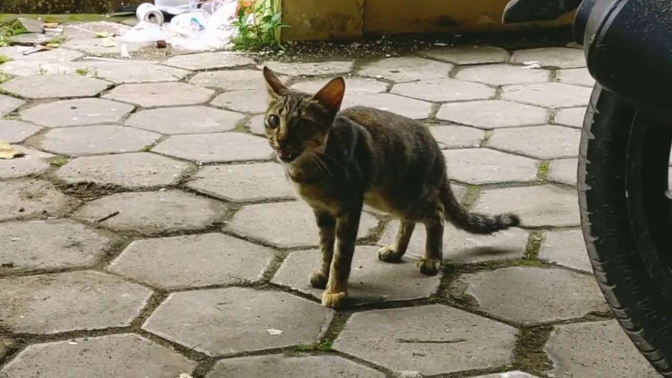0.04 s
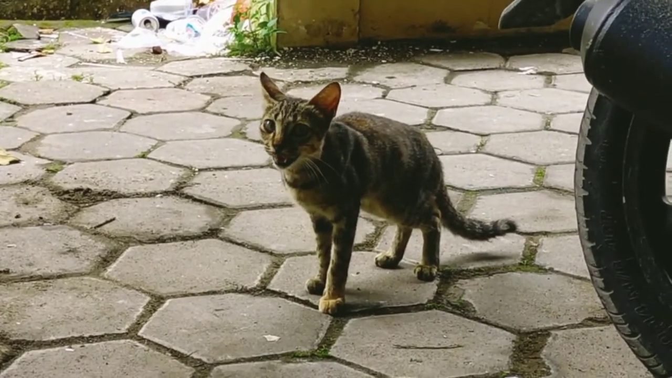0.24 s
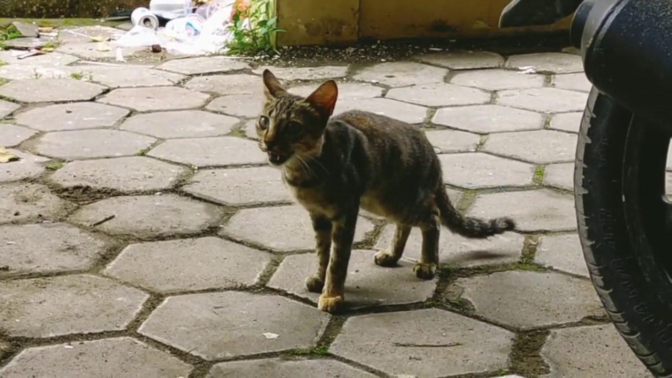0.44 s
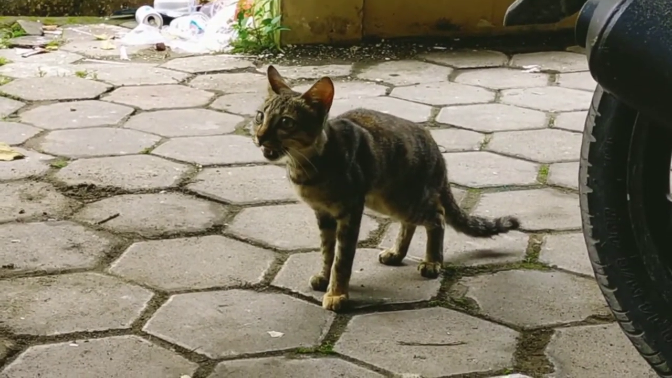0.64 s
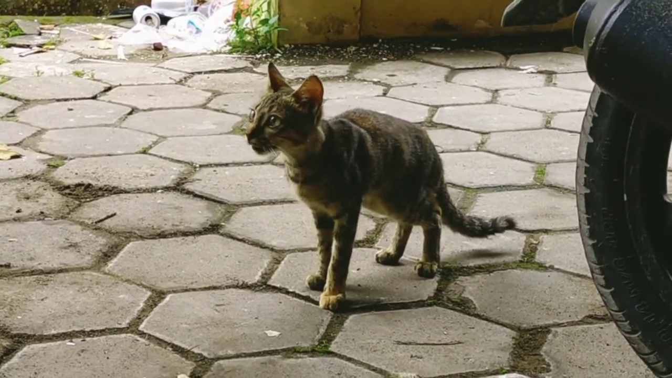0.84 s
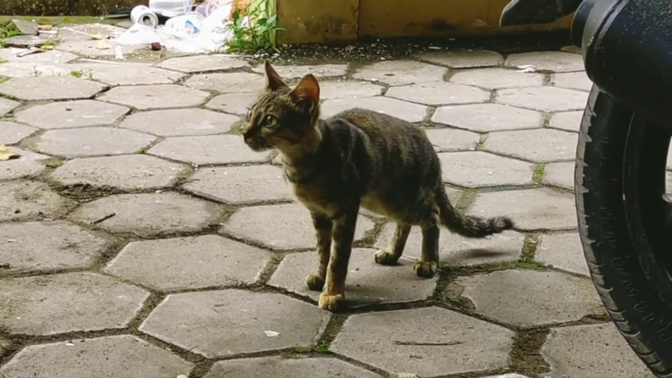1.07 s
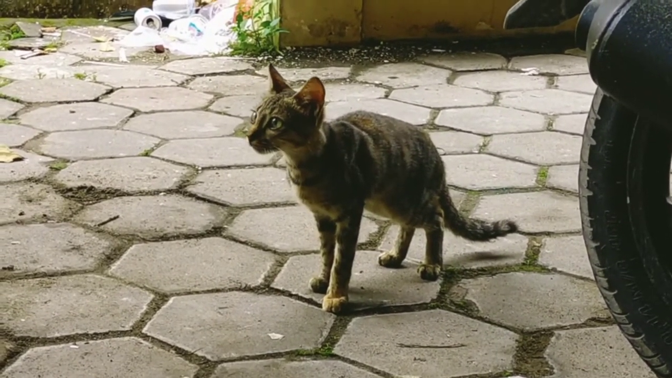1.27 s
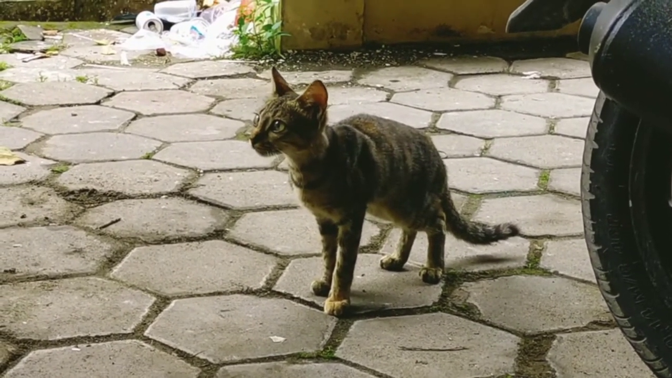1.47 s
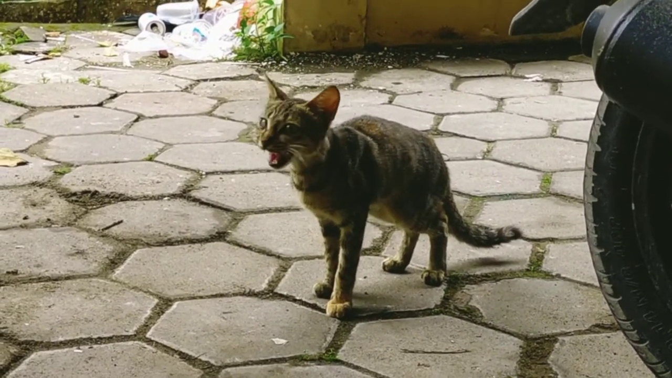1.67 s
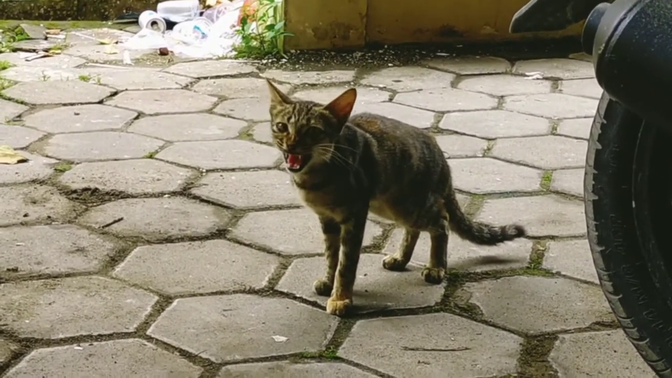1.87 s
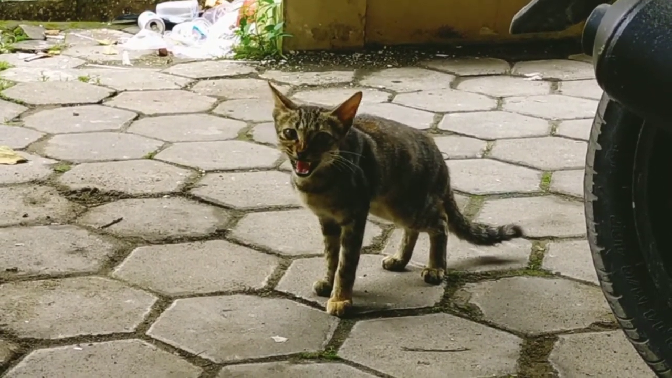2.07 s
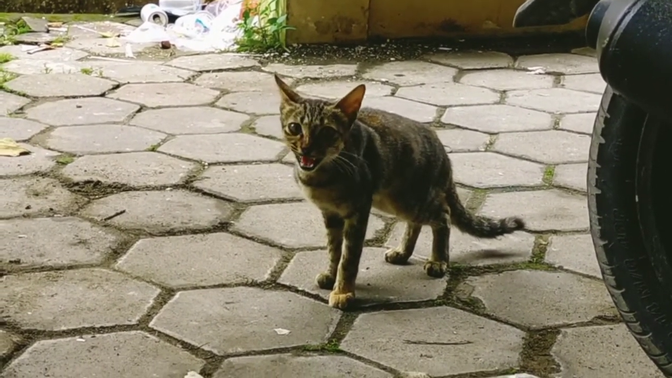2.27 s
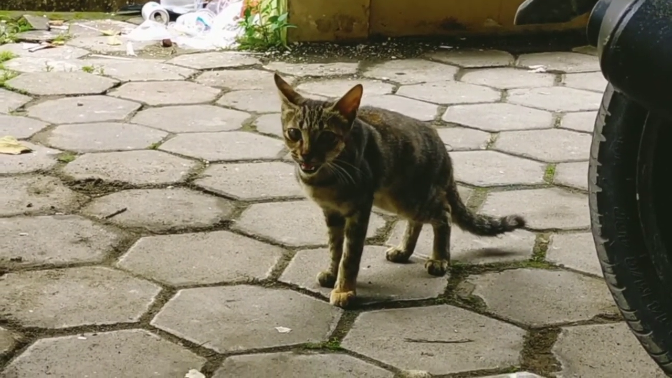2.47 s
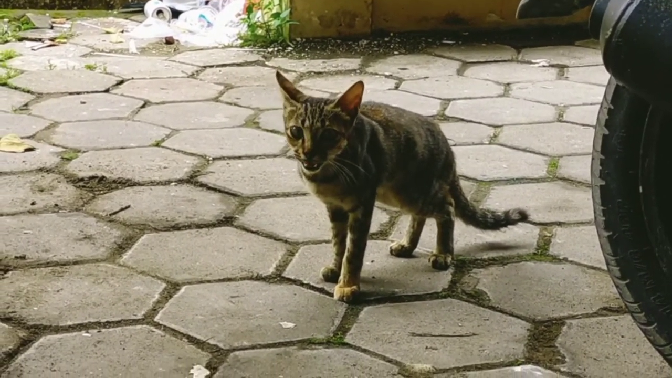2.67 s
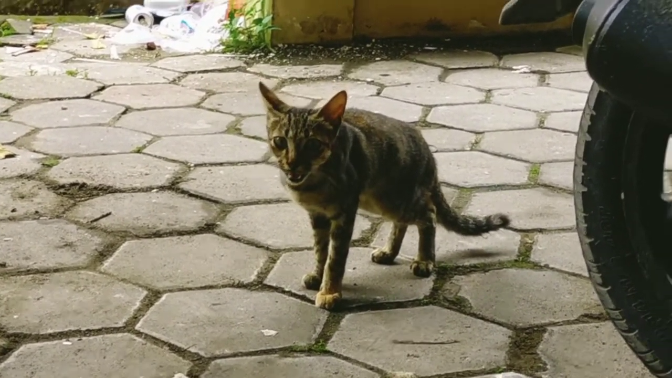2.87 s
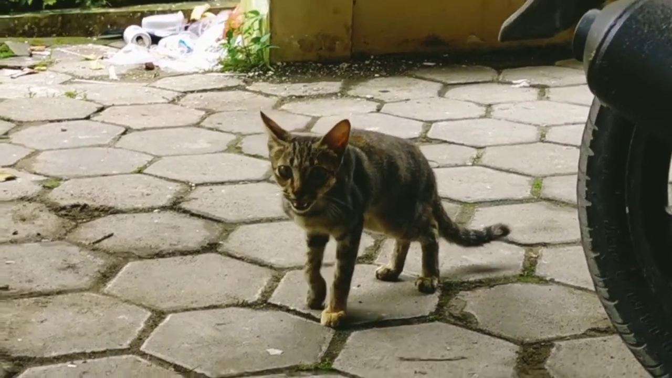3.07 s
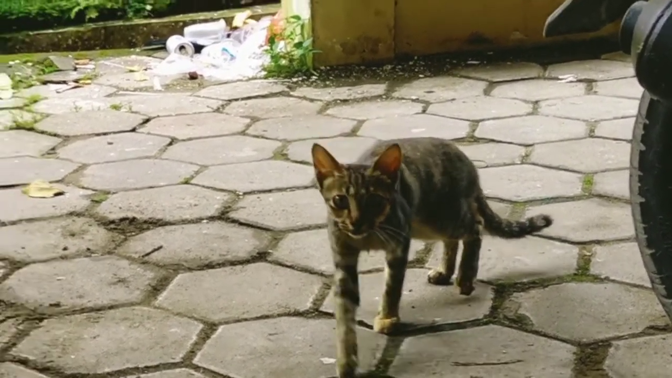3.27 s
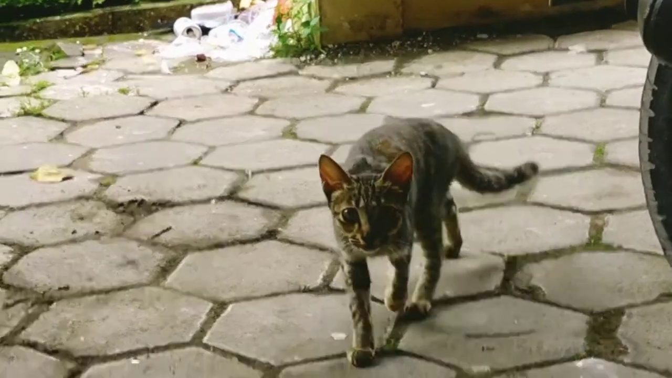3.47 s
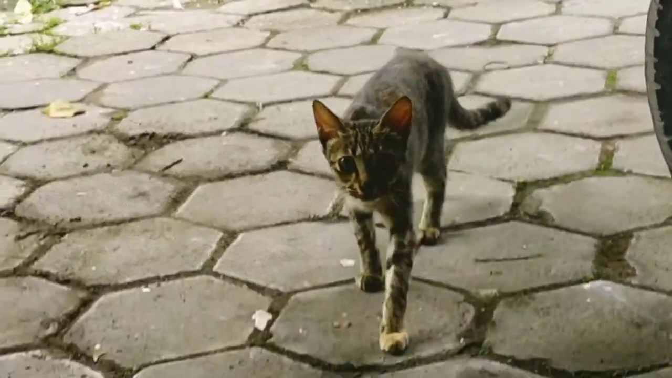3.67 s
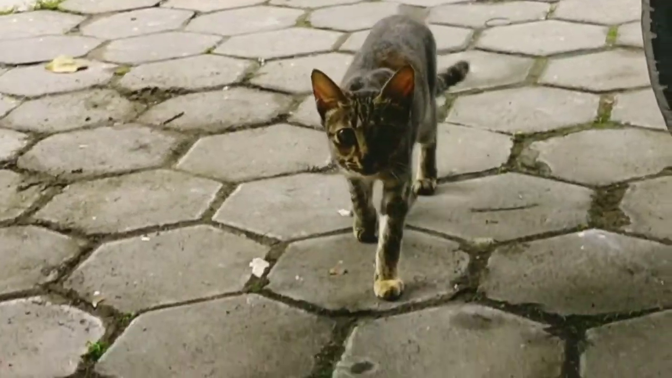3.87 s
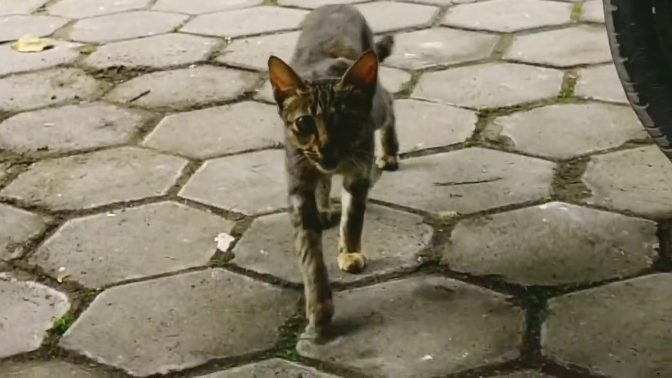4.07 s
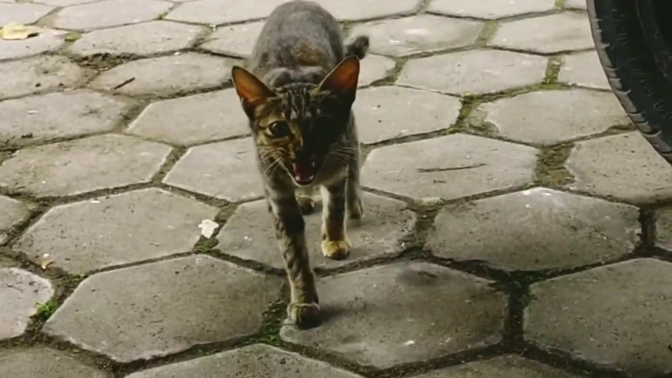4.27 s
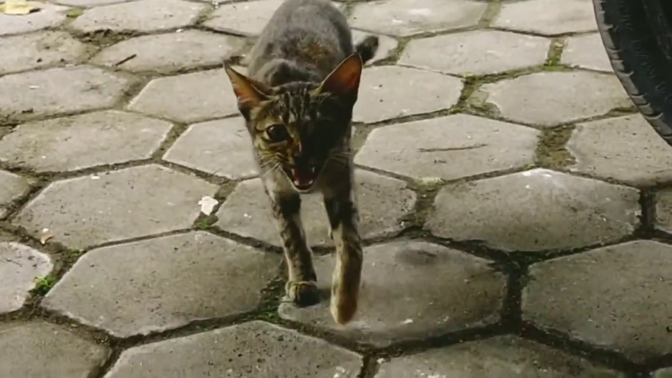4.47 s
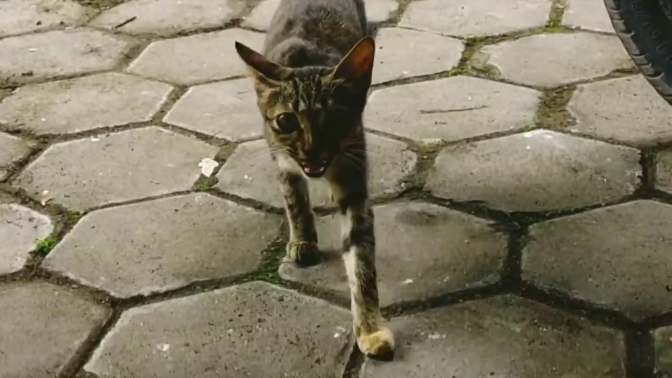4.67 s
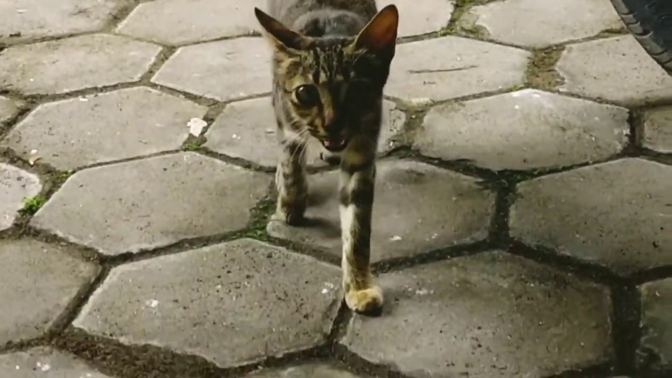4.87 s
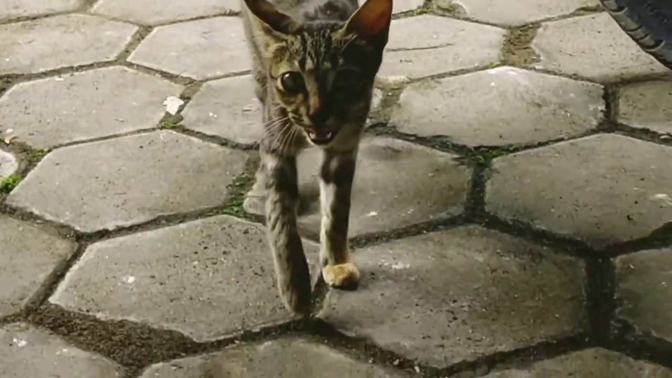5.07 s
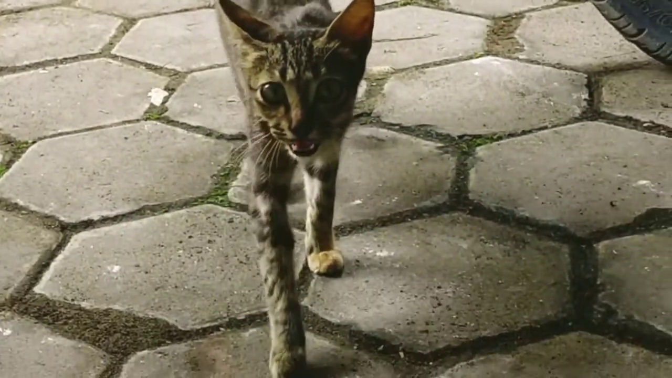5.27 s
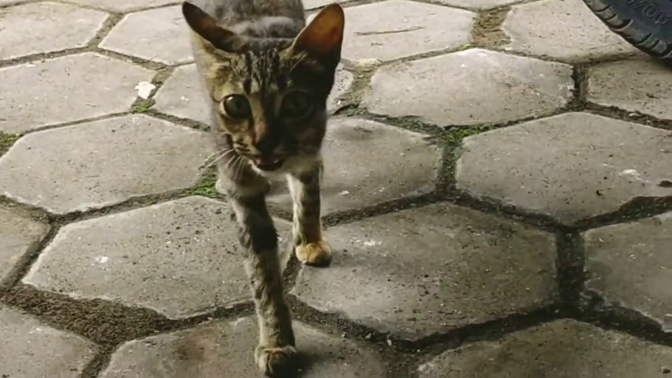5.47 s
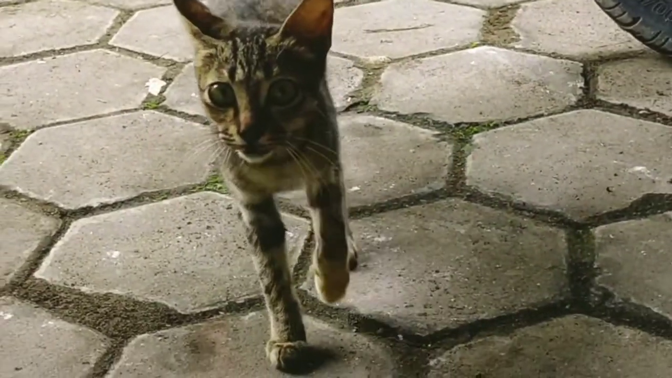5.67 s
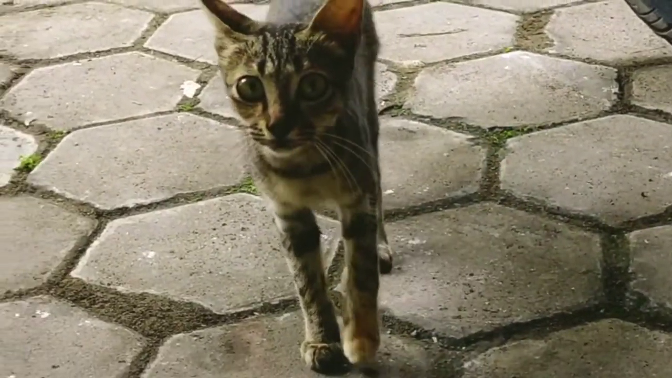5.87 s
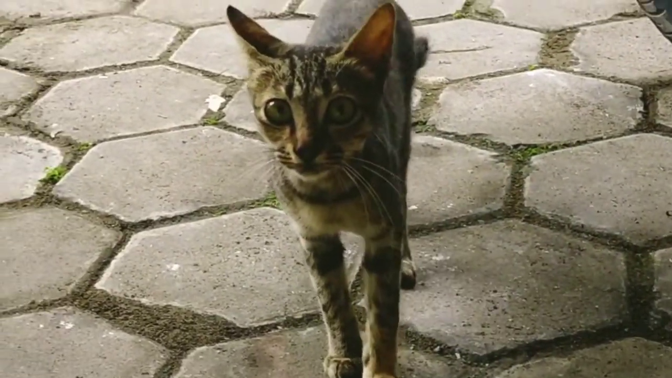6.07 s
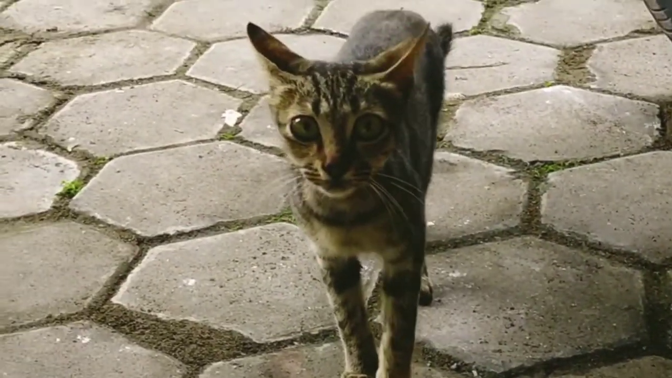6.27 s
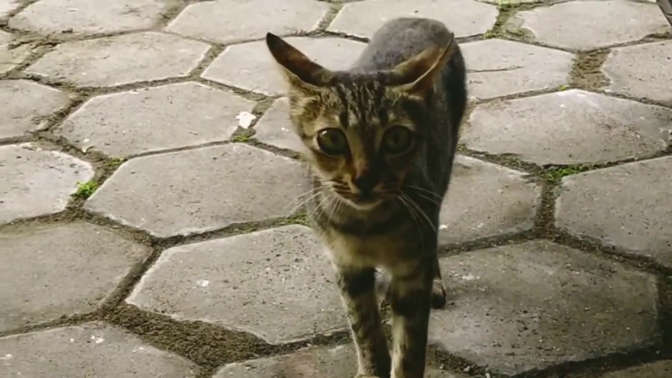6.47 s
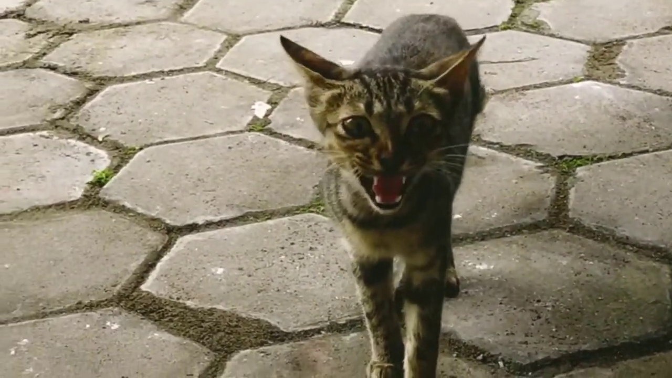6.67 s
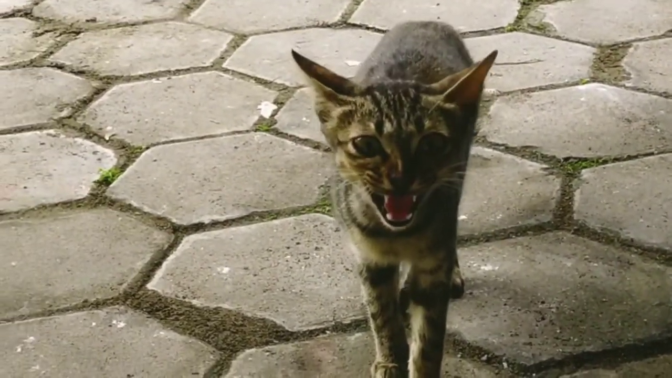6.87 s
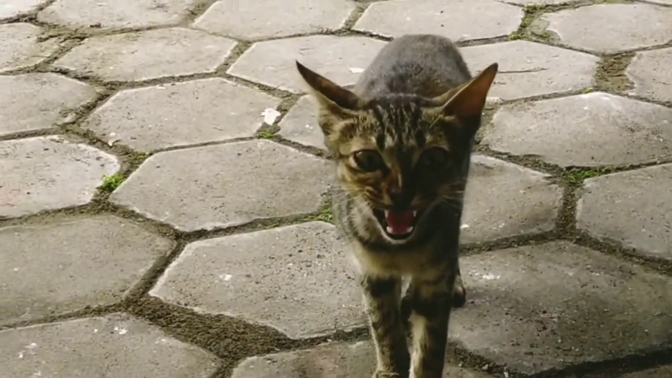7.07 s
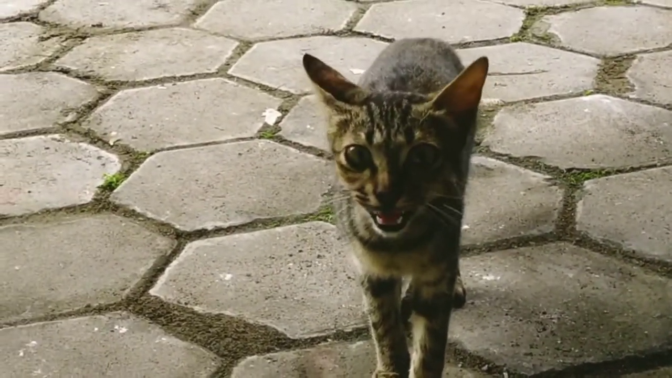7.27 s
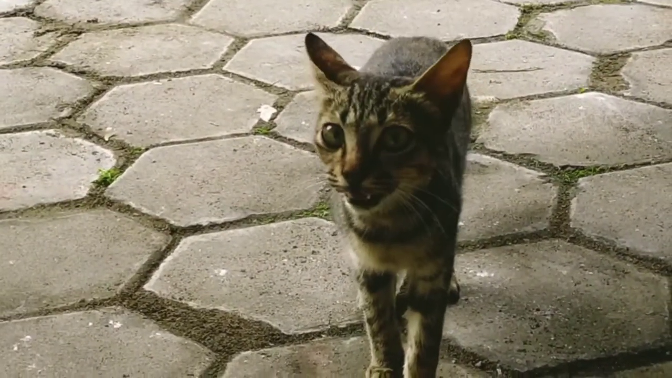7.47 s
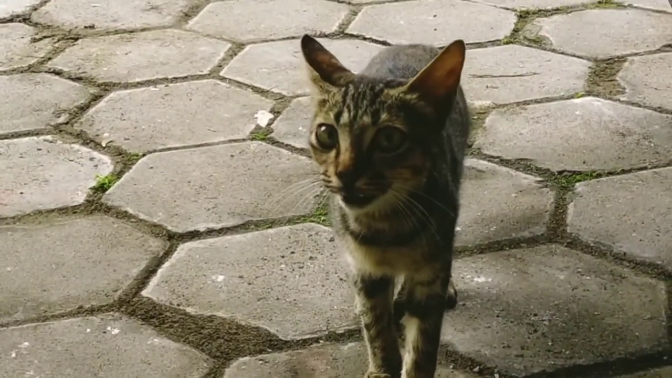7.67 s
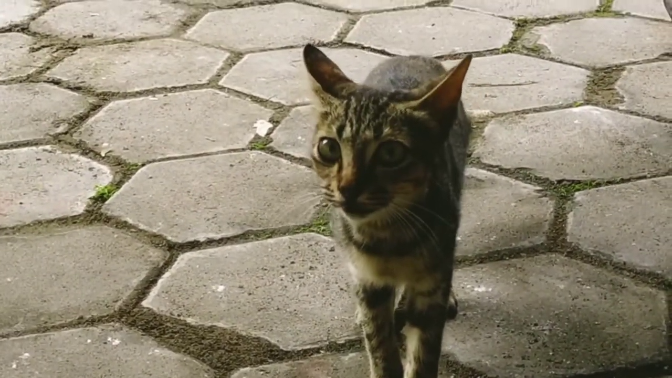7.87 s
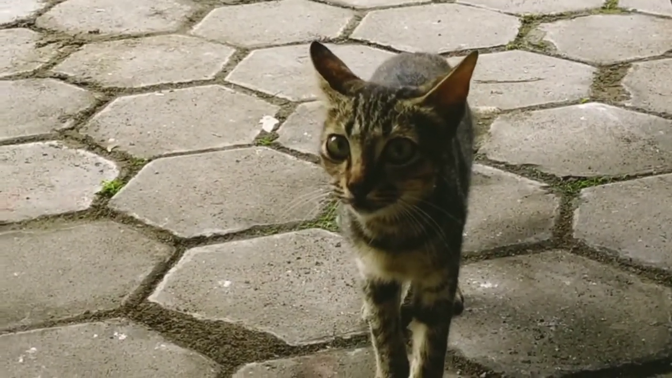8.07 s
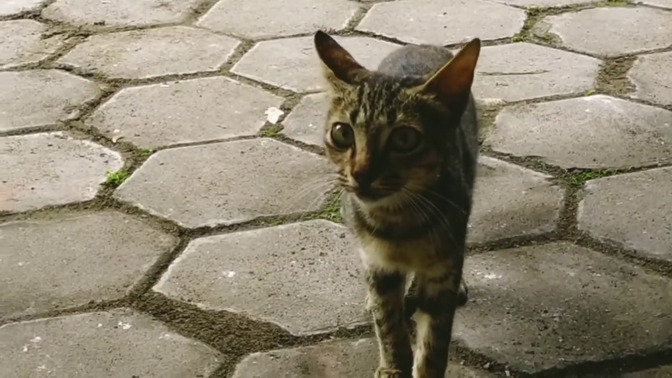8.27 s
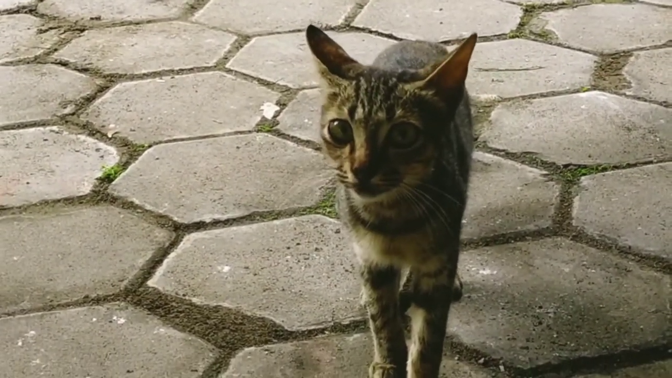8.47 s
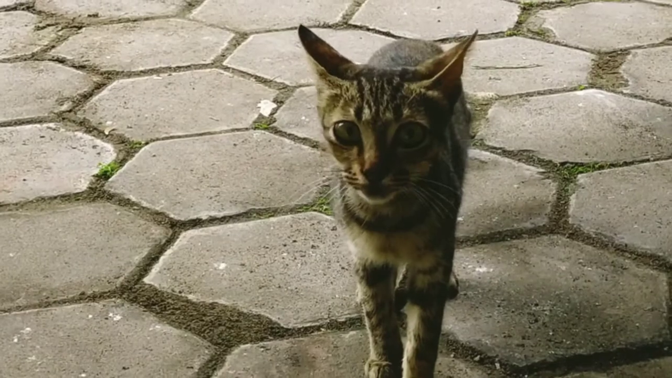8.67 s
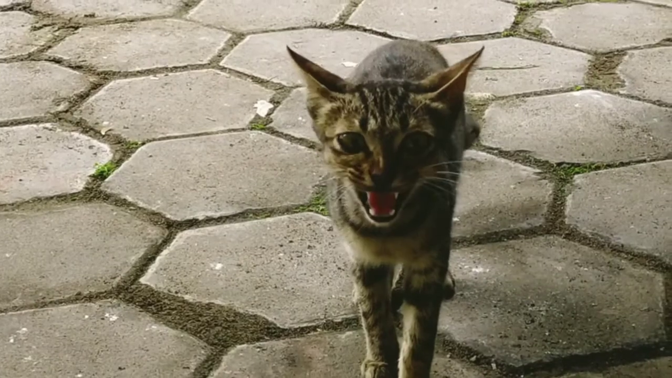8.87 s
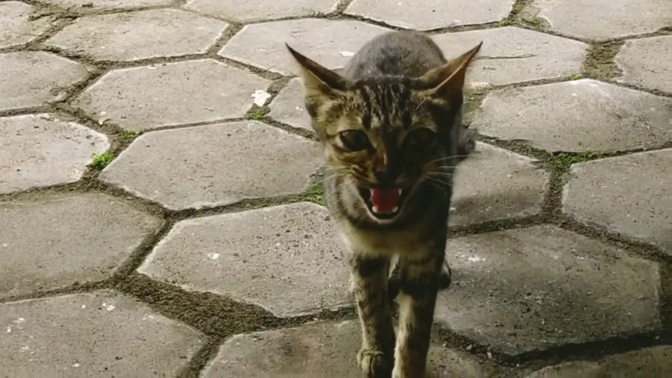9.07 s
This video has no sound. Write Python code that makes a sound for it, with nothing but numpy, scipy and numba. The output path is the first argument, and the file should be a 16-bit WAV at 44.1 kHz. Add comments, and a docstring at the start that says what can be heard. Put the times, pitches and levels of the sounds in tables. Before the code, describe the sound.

A young cat meows five times in a paved yard, coming closer and louder, over a faint low motor hum and soft outdoor air.

```python
"""Young cat in a yard

A young cat meows five times in a paved yard, walking up to the microphone.
Its vocal folds send pulses and breath through a throat and mouth that act as moving filters.
Calls grow hoarse at their ends; each also starts hoarse, though the first is already under way.
Scattered echoes ring briefly. A motor hums far off, with outdoor air, a thin whine and one faint chirp.
Late in the scene a soft high hiss swells six times."""
import sys
import numpy as np
from scipy import signal
from scipy.fft import rfft, irfft
from scipy.io import wavfile
from scipy.ndimage import uniform_filter1d
from numba import njit

SR = 44100
rng = np.random.default_rng(int(sys.argv[2]) if len(sys.argv) > 2 else 0)


def wrap_up_sound(samples):
    """Save the sound to the file named by the first command line argument, as 16-bit audio."""
    columns = np.atleast_2d(samples).T
    # keep every value between -1 and 1, then stretch to whole-number steps
    tamed = np.clip(columns, -1, 1)
    steps = np.round(tamed * 32767).astype(np.int16)
    wavfile.write(sys.argv[1], SR, steps)


N = 402191
T = np.arange(N) / SR  # time of every sample, in seconds

# Steady tones of the distant motor: (frequency [Hz], rms level [dB])
MOTOR_LINES = [(48.4, -48), (75.2, -37.5), (97, -54), (145.3, -57.5), (175, -55)]
# Colour of the outdoor air: (frequency [Hz], relative level per Hz [dB])
AIR_COLOUR = [(20, -16), (45, -13), (65, -9), (100, -15.5), (170, -17.5), (290, -25), (400, -24.5),
              (550, -26), (2400, -25.5), (2850, -33), (4400, -38.5), (5600, -45.5), (8000, -41.5),
              (10000, -53), (15500, -46)]
# Far chirps: (start time [s], peak level [dB])
FAR_CHIRPS = [(1.14, -61)]
# One row per meow; levels and ring pitch are starting points that effort, jaw, pitch and hoarseness shift:
# (hoarse start lasts [s], hoarse end lasts [s], second partial [dB], lower throat [dB],
#  upper throat [dB], high ring [dB], high ring [Hz])
MEOW_VOICES = [(0.22, 0.053, -40, -37.5, -41, -43.5, 7570), (0.33, 0.039, -40.5, -37, -41, -41, 8070),
               (0.419, 0.18, -35.5, -33, -38.5, -37, 7780), (0.248, 0.25, -39.5, -31, -39.5, -36, 7770),
               (0.22, .2, -42, -31, -39.5, -37, 7710)]
# One list per meow, the path of the voice; the mouth resonance is high when the mouth is wide open:
# (time [s], pitch [Hz], effort [dB], mouth resonance [Hz])
MEOW_GESTURES = [
    [(-.3, 420, -30, 1900), (0, 413, -28, 1620), (.06, 397.8, -25.5, 1460), (.12, 395.4, -32, 1660),
     (.29, 401.2, -23.5, 1660), (.41, 403.5, -26, 1750), (.52, 400.7, -28, 1710), (.58, 392.8, -29, 1700),
     (.69, 398, -37, 1470)],
    [(1.52, 364.3, -37, 2040), (1.58, 374.2, -31, 2740), (1.65, 429, -29.5, 2950), (1.75, 450.5, -24, 2850),
     (1.93, 433.7, -25.5, 2750), (2.0, 426.3, -25, 2562), (2.17, 415.5, -31, 2220),
     (2.26, 398.6, -27, 1830), (2.35, 388.7, -28, 1890), (2.6, 381, -33.5, 1740),
     (2.73, 400.6, -23.5, 1890), (2.86, 411.7, -28, 1960), (2.96, 407.9, -25.5, 1950),
     (3.02, 396.5, -35, 1818)],
    [(3.99, 339.4, -33.5, 2180), (4.05, 330.7, -35, 2820), (4.12, 379, -32.5, 2860),
     (4.21, 405.3, -30, 3030), (4.29, 412.3, -26.5, 2760), (4.34, 420, -21.5, 2900),
     (4.41, 433.3, -24, 2600), (4.6, 413.3, -25.5, 1840), (4.8, 411, -25.5, 1760), (4.91, 427.1, -21, 2080),
     (5.14, 415, -25, 1760), (5.32, 409.6, -23.5, 1586), (5.4, 397.4, -26.5, 1500),
     (5.53, 364.6, -39, 1260)],
    [(6.43, 309.7, -34, 2160), (6.49, 312.6, -25.5, 3100), (6.55, 348.4, -27, 3080),
     (6.61, 419.7, -22.5, 3150), (6.72, 430.7, -20.5, 3200), (6.78, 440, -15, 3170),
     (7.01, 449.5, -19, 3150), (7.08, 444, -23, 2564), (7.17, 423.5, -23, 2112), (7.33, 386.2, -31, 1830),
     (7.56, 351.2, -36, 1553), (7.7, 344, -38.5, 1380)],
    [(8.59, 314.3, -36, 2300), (8.645, 326.7, -25.5, 2940), (8.68, 387.3, -24.5, 3170),
     (8.72, 384.6, -23.5, 3130), (8.75, 421, -21.5, 3140), (8.82, 443.2, -16.5, 3170),
     (8.89, 449.4, -16, 3240), (9.12, 446, -16.5, 3255), (9.5, 440, -20, 2970)],
]
# Moments when the voice catches: (time [s], pitch jump [share of the pitch])
VOICE_CATCHES = [(2.135, -0.018), (4.712, 0.036), (5.165, 0.037), (5.469, 0.027), (7.128, -.02),
                 (7.394, 0.021)]
# Swells of high hiss: (start time [s], level [dB])
HISS_SWELLS = [(5.88, -43), (6.42, -41.5), (7.05, -38.5), (7.571, -39.5), (8.14, -42.5), (8.68, -46)]
# Colour of the hiss: (frequency [Hz], relative level per Hz [dB])
HISS_SPECTRUM = [(1500, -2.5), (3000, 3), (5000, -5.5), (6200, -5.5), (8000, 0), (10000, -6), (12000, -7.5),
                 (15000, 1)]

AIR_DB = -46  # rms above 300 Hz
WHINE_HZ, WHINE_DB = 2350, -57.5
CHIRP_HZ, CHIRP_S = 3700, 0.22
TOP_HZ = 15500  # the sound is cut steeply above this

SHUT_HZ, OPEN_HZ = 1730, 3090  # mouth resonance with the jaw nearly shut and wide open
USUAL_DB, USUAL_HZ = -26, 420  # an ordinary effort and pitch
ATTACK_S, RELEASE_S = 0.031, 0.025
SAG, SAG_S = 0.046, 0.052  # the pitch sags by this share, over this time, as the air runs out
TREMOR, TREMOR_HZ = 0.003, 14  # unsteadiness of the pitch (share, rate)
CATCH_S = 0.035  # after a catch the pitch slides back with this time constant
# Hoarseness runs from 0 to 1; these parts add up
HOARSE_START, HOARSE_END, HOARSE_HELD = 0.498, 0.43, 0.049
HOARSE_OPEN, HOARSE_CATCH = 0.028, 0.18  # extra with the mouth wide open, and just after a catch
# How each resonance grows: (dB per dB of effort, dB as the jaw drops fully)
LOWER_GROWTH, UPPER_GROWTH, RING_GROWTH = (0.53, -10.5), (0.5, 6.5), (0.64, 0.41)
RING_FOLLOWS, RING_JAW_HZ = 0.15, 392  # the ring rises with this power of the pitch, and as the jaw drops


def undb(db):
    """Turn decibels into a gain."""
    return 10 ** (np.asarray(db) / 20)


def unit(x):
    """Scale to rms 1."""
    return x / np.sqrt(np.mean(x ** 2))


def walk(rate, size):
    """Smooth random drift of rms 1, with about this many new targets a second."""
    k = max(int(SR / rate), 1)
    steps = np.repeat(rng.standard_normal(size // k + 1), k)
    smooth = uniform_filter1d(uniform_filter1d(steps, k), k)
    return unit(smooth[:size])


def sweep(hz):
    """Running phase of a tone whose frequency may move: the sum of its small steps."""
    return 2 * np.pi * np.cumsum(hz) / SR


def motor():
    """Low steady tones that wander a little in speed and level."""
    total = 0
    for hz, db in MOTOR_LINES:
        level = np.sqrt(2) * undb(db + 0.5 * walk(6.4, N))  # the root of 2 turns rms into peak
        total = total + level * np.sin(sweep(hz * (1 + 0.0053 * walk(2.026, N))))
    return total


def noise(colour):
    """Random noise shaped to the given spectrum, with rms 1 counting only what lies above 300 Hz."""
    f = np.arange(N // 2 + 1) * SR / N
    hz, db = np.transpose(colour)
    shape = undb(np.interp(np.log(f + 1), np.log(hz), db))
    spectrum = rfft(rng.standard_normal(N)) * shape
    return irfft(spectrum, N) / np.std(irfft(spectrum * (f > 300), N))


def outdoor_air():
    """A broad soft noise whose level drifts slightly."""
    return noise(AIR_COLOUR) * undb(AIR_DB + 0.5 * walk(2.72, N))


def far_tones(wander=0.0066):
    """A thin wavering whine and one faint chirp in the distance, both sine tones of unsteady pitch."""
    def tone(hz):
        return np.sin(sweep(hz * (1 + wander * walk(60, N))))

    chirp = sum(undb(db) * np.sin(np.pi * np.clip((T - s) / CHIRP_S, 0, 1)) for s, db in FAR_CHIRPS)
    whine = undb(WHINE_DB + 3.6 * walk(14, N)) * tone(WHINE_HZ)
    return whine + chirp * tone(CHIRP_HZ)


def curves(rows, t):
    """The columns of a table, joined by straight lines in time."""
    s, *columns = np.transpose(rows)
    return [np.interp(t, s, c) for c in columns]


def folds(hz, hoarse, jaw, jitter=0.0339, waver=0.00212, rasp=1.0, count=38):
    """Vocal folds: a pulse per cycle; hoarseness shakes its timing and size and adds puffs of turbulence."""
    n = len(hz)
    hz = hz * (1 + jitter * hoarse * walk(260, n) + waver * walk(44.26, n))
    phase = sweep(hz)
    # cosines that all peak together make one sharp pulse
    pulses = unit(sum(np.cos(k * phase) for k in range(1, count + 1)))
    puffs = unit((1 + np.cos(phase)) * rng.standard_normal(n))
    # a cry forced through the open mouth frays in the treble
    fray = (0.15 + 0.35 * jaw) * unit(np.diff(puffs, 2, prepend=[0, 0]))
    shaken = pulses * undb(4.8 * hoarse * walk(200, n))
    return shaken + (0.0063 + rasp * hoarse) * puffs + fray, phase


@njit
def svf(x, hz, width):
    """Band-pass filter with a moving centre, where its gain is 1."""
    y, b, l = np.empty(len(x)), 0., 0.
    for i in range(len(x)):
        g, k = np.tan(np.pi * hz[i] / SR), width / hz[i]
        v = (b + g * (x[i] - l)) / (1 + g * (g + k))
        b, l, y[i] = 2 * v - b, l + 2 * g * v, k * v
    return y


def resonance(x, hz, width_hz, drift=0.027):
    """A steep resonance of the vocal tract that drifts a little, with its level held near rms 1."""
    centre = hz * (1 + drift * walk(13.98, len(x)))
    y = svf(svf(x, centre, float(width_hz)), centre, float(width_hz))
    return y / np.sqrt(np.abs(uniform_filter1d(y ** 2, size=900)) + 1e-18)


def tract(source, mouth_hz, ring_hz, jaw, hoarse, mouth_db, lower_db, upper_db, ring_db,
          side_hz=5650, side_width_hz=1000, side_depth=0.47):
    """The folds ring the mouth and the throat, and many of the resonances rise as the jaw drops."""
    mouth = undb(mouth_db - 2.1 * hoarse) * resonance(source, mouth_hz, 404, drift=0.029)
    # leaky folds blur the resonances
    rasp = hoarse * undb(mouth_db - 8) * resonance(source, 2860, 1600, drift=0.0067)
    throat = undb(lower_db) * resonance(source, 1150 + 200 * jaw, 490, drift=0.064)
    # speaks only with the jaw dropped
    cheek = jaw * undb(mouth_db - 16.0) * resonance(source, 1888, 220, drift=0.029)
    upper_hz = np.interp(mouth_hz, [1250, 1650, 2020, 3400], [3380, 3920, 3940, 4580])
    upper = undb(upper_db - 2.0) * resonance(source, upper_hz, 610, drift=0.031)
    ring = undb(ring_db - 2.35) * resonance(source, ring_hz, 920, drift=0.0098)
    ring += undb(ring_db - 11.5) * resonance(source, 6870, 270, drift=0.04)
    sheen = undb(ring_db - 18.5 - 5.7 * jaw) * resonance(source, 11200 + 500 * jaw, 900, drift=0.012)
    sheen += undb(ring_db - 15.5 - 12 * jaw) * resonance(source, 14100, 1800, drift=0.07)
    voice = mouth + rasp + throat + cheek + upper + ring + sheen
    # a side cavity of the throat swallows one band, most of all with the mouth nearly shut
    swallowed = svf(voice, np.full(len(source), float(side_hz)), float(side_width_hz))
    return voice - side_depth * (1 - jaw / 2) * swallowed


def meow(call, gesture, flutter_db=1.24, hoarse_dulls_db=6, hoarse_upper_db=3):
    """One call: hoarse until the folds settle and again as air runs out; effort and jaw shape the tone."""
    start, end = gesture[0][0], gesture[-1][0]
    settle_s, fray_s, second_db, lower_db, upper_db, ring_db, rest_hz = call
    live = (T > start - 0.02) & (T < end + RELEASE_S)
    t = T[live]
    hz, effort_db, mouth_hz = curves(gesture, t)
    jaw = np.clip((mouth_hz - SHUT_HZ) / (OPEN_HZ - SHUT_HZ), 0, 1)  # 0 nearly shut, 1 wide open

    # each catch starts at once and dies away
    catches = [(jump, (t > s) * np.exp(-np.abs(t - s) / CATCH_S)) for s, jump in VOICE_CATCHES]
    hz = hz * (1 - SAG * np.clip((t - end) / SAG_S + 1, 0, 1))
    hz = hz * (1 + TREMOR * walk(TREMOR_HZ, len(t)) + sum(jump * slide for jump, slide in catches))

    settling = np.clip(1 - (t - start) / settle_s, 0, 1)
    tiring = np.clip(1 - (end - t) / fray_s, 0, 1)
    hoarse = HOARSE_HELD + HOARSE_OPEN * jaw + HOARSE_START * settling + HOARSE_END * tiring
    hoarse = np.clip(hoarse + HOARSE_CATCH * sum(slide for jump, slide in catches), 0, 1)

    def flutter():
        return flutter_db * walk(21.81, len(t))

    def grown(db, growth):
        return db + growth[0] * (effort_db - USUAL_DB) + growth[1] * jaw + flutter()

    source, phase = folds(uniform_filter1d(hz, size=400), hoarse, jaw)
    ring_hz = rest_hz * (hz / USUAL_HZ) ** RING_FOLLOWS + RING_JAW_HZ * jaw
    mouth_level = effort_db + flutter()
    lower_level = grown(lower_db, LOWER_GROWTH)
    upper_level = grown(upper_db, UPPER_GROWTH) + hoarse_upper_db * hoarse
    ring_level = grown(ring_db, RING_GROWTH) - hoarse_dulls_db * hoarse
    voice = tract(source, mouth_hz, ring_hz, jaw, hoarse, mouth_level, lower_level, upper_level, ring_level)

    # the lowest two partials leave through nose and chest and grow less with effort
    nasal = undb(0.21 * effort_db - 39.5 - 9.0 * jaw) * np.sin(phase)
    nasal += undb(grown(second_db, (0.35, -4))) * np.sin(2 * phase + 1)
    fade_in = np.clip((t - start + 0.0098) / ATTACK_S, 0, 1)
    fade_out = np.clip((end - t) / RELEASE_S + 1, 0, 1)
    out = np.zeros(N)
    out[live] = fade_in * fade_out * (voice + (1 - hoarse) * nasal)
    return out


def paving_bounce(cat):
    """One echo off the paving; it lags more as the cat comes closer, so partials swell and fade in turn."""
    lag_s = np.interp(T, [3, 6.5], [0.00148, 0.0026]) * (1 + 0.037 * walk(3, N))
    return undb(-14.5) * np.interp(T - lag_s, T, cat)


def yard(x, t60_low=0.84, t60_high=0.95, split_hz=4500, treble_db=1):
    """Scattered echoes from walls and paving: noise tails that die by 60 dB in each t60 (seconds)."""
    t = T[:SR]
    low_pass = signal.butter(2, split_hz, fs=SR, output="sos")
    high_pass = signal.butter(2, split_hz, "high", fs=SR, output="sos")
    low = signal.sosfilt(low_pass, rng.standard_normal(SR))
    high = signal.sosfilt(high_pass, rng.standard_normal(SR))
    build = np.clip((t - 0.006) / 0.012, 0, 1)  # the first echoes arrive after 6 ms
    tail = build * undb(-60 * t / t60_low)
    response = low * tail + undb(treble_db - 60 * t / t60_high) * build * high
    return signal.fftconvolve(x, response / np.sqrt(np.sum(tail ** 2)))[:N]


def hiss(rise_s=0.018, hold_s=0.13, fall_db_per_s=95):
    """Bright noise in swells that come up quickly, hold and fade."""
    swell = 0
    for s, db in HISS_SWELLS:
        fall_db = fall_db_per_s * np.maximum(T - s - hold_s, 0)
        swell = swell + np.clip((T - s) / rise_s, 0, 1) * undb(db - fall_db)
    return swell * noise(HISS_SPECTRUM)


def scene():
    """The cat sounds drier, with less echo, as it comes nearer over the outdoor background."""
    cat = sum(meow(call, gesture) for call, gesture in zip(MEOW_VOICES, MEOW_GESTURES))
    wet_db = np.interp(T, [3, 6.5], [-7, -12])
    echoes = paving_bounce(cat) + yard(cat * undb(wet_db))
    background = motor() + outdoor_air() + far_tones() + hiss()
    return (cat + echoes + background)[None]


def record(dry):
    """A steep low-pass filter cuts the very top."""
    return signal.sosfilt(signal.ellip(10, 0.2, 80, TOP_HZ, fs=SR, output="sos"), dry)


dry = scene()
out = record(dry)
wrap_up_sound(out)
```